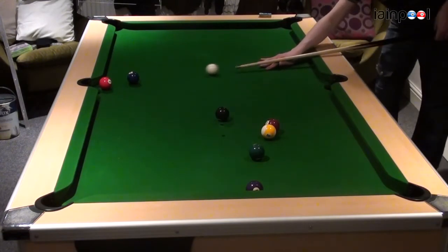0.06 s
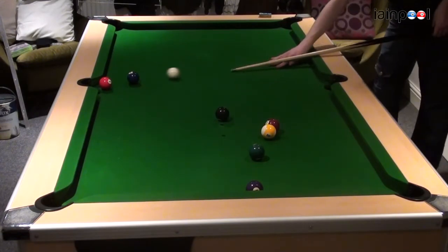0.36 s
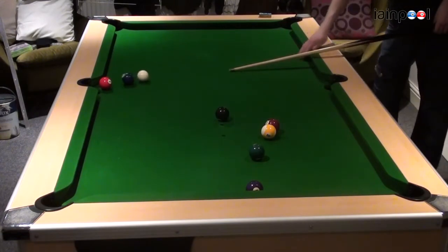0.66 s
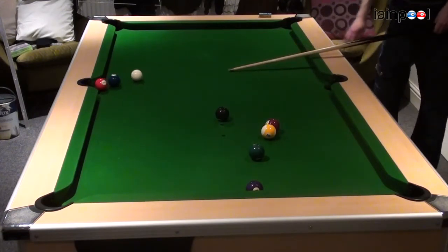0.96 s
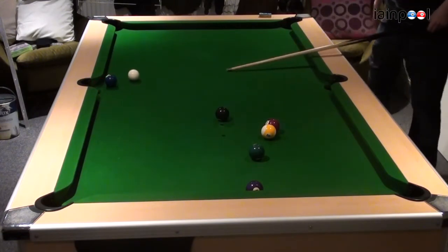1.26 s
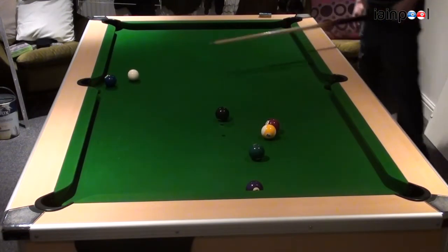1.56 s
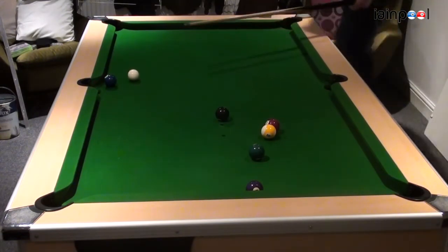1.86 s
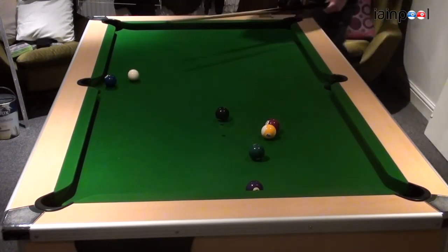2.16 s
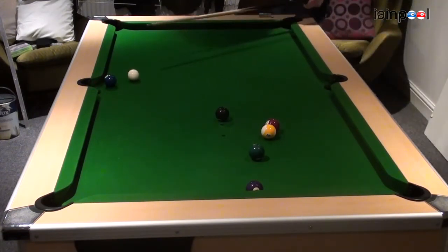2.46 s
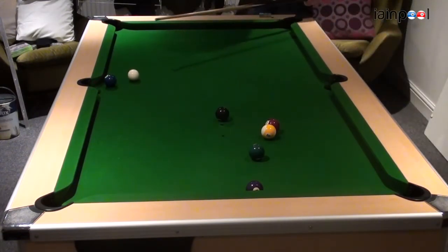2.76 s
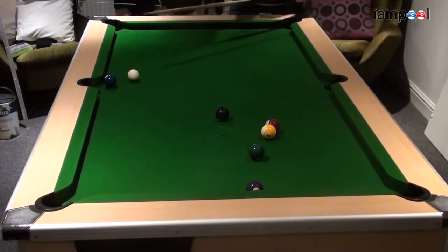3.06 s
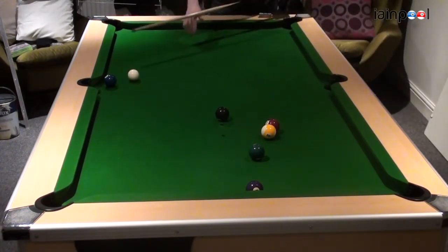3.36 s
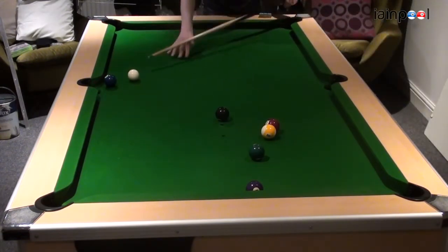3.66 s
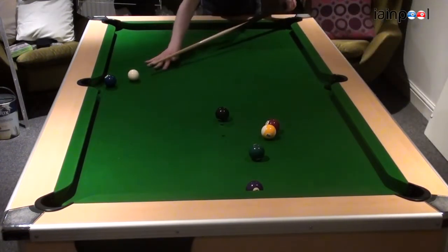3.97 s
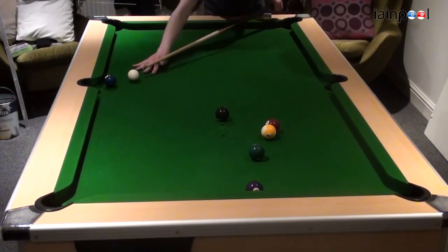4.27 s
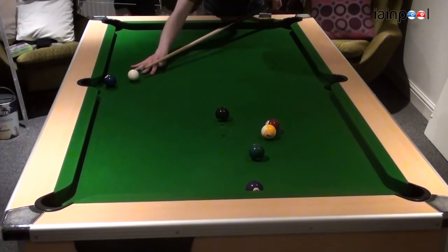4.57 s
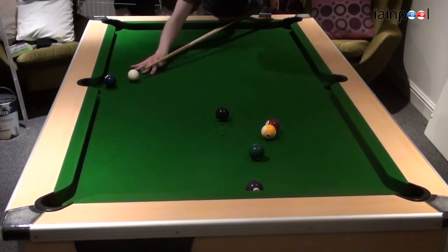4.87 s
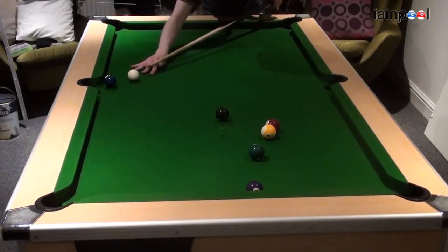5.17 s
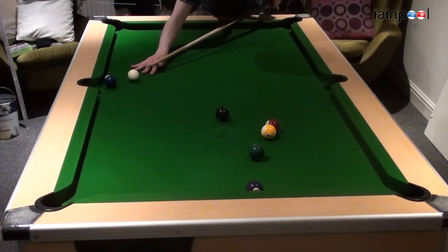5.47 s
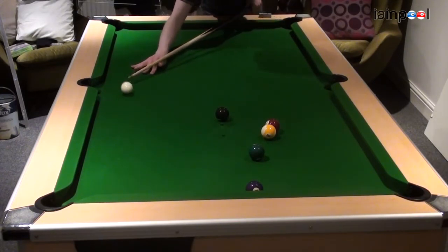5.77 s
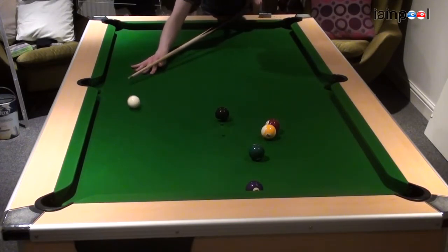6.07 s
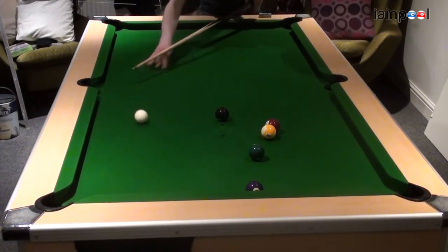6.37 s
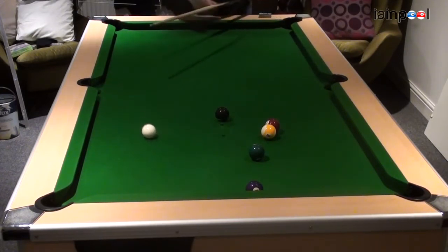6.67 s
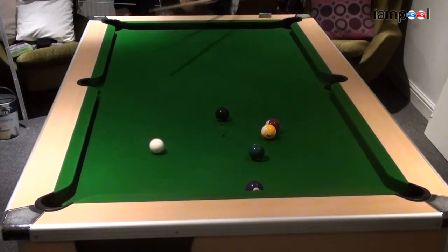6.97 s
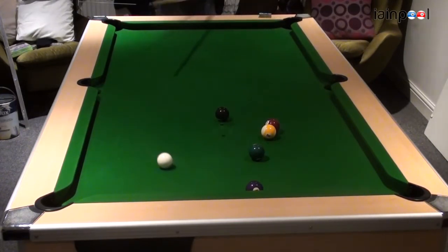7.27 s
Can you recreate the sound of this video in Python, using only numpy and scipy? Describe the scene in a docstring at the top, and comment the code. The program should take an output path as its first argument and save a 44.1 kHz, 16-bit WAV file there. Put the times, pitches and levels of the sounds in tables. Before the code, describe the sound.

Two pool balls are potted in turn, with sharp clicks, pocket thuds, loud wooden knocks and a low rolling rumble.

```python
"""Two pots on a pool table

In a small, quiet room with a faint tick, a sleeve rustles and the cloth hisses. Colliding balls
radiate short pulses, heard as clicks. Each potted ball drops through a pocket, slams into the wooden
return channel and rumbles along it; the first also knocks at the bends and reaches the tray.
Every impact on the wood excites damped modes, which ring on together with the room."""
import sys
import numpy as np
from scipy import signal
from scipy.io import wavfile

SR = 44100
rng = np.random.default_rng(int(sys.argv[2]) if len(sys.argv) > 2 else 0)


def master_out(mix):
    """Clip the mix to full scale and print it as 16-bit PCM to the path in sys.argv[1]."""
    frames = np.transpose(np.atleast_2d(mix))
    ceiling = np.clip(frames, -1, 1)
    pcm = np.round(ceiling * 32767).astype(np.int16)
    wavfile.write(sys.argv[1], SR, pcm)


N = 332073
AGE = np.arange(SR) / SR   # time since an impact [s]


def from_db(db):
    """Level to amplitude ratio."""
    return np.exp(np.asarray(db) * (np.log(10) / 20))


def rms_one(x, count=None):
    """Normalise to unit rms over the first count samples."""
    return x / np.sqrt(np.mean(x[..., :count] ** 2) + 1e-30)


def at_hz(points, hz):
    """Interpolation on a log-frequency axis."""
    frequencies, values = np.array(points).T
    return np.interp(np.log(hz), np.log(frequencies), values)


def cut(x, hz, kind, order=2):
    """Causal Butterworth filter."""
    return signal.sosfilt(signal.butter(order, np.minimum(hz, .48 * SR), kind, fs=SR, output="sos"), x)


def add(out, s, sound):
    """Superpose a sound at time s."""
    at = round(s * SR)
    out[:, at:at + sound.shape[-1]] += sound[..., :N - at]


def bands(size, side_db):
    """Third-octave bands of stereo noise: (centre [Hz], width [Hz], signal)."""
    edges = 28 * 2 ** (np.arange(29) / 3)
    white = rng.standard_normal((2, 2, size + SR // 10))
    for k, (low, high) in enumerate(zip(edges, edges[1:])):
        mid, side = cut(white[k % 2], [low, high], "band", order=3)[:, -size:]
        hz = np.sqrt(low * high)
        yield hz, high - low, mid + from_db(at_hz(side_db, hz)) * side * [[1], [-1]]


def noise(spectrum, side_db):
    """Stationary noise of unit rms: band power is spectral density times bandwidth."""
    return rms_one(sum(from_db(at_hz(spectrum, hz)) * np.sqrt(width) * rms_one(band)
                       for hz, width, band in bands(N, side_db)))


def swells(rows, rest_db):
    """Incoherent addition: the powers of brief swells sum above a resting level."""
    power = from_db(rest_db) ** 2
    for s, rise_s, db in rows:
        age = np.clip((np.arange(N) / SR - s) / rise_s, 0, 10)
        power = power + from_db(db) ** 2 * age ** 2 * np.exp(1 - age ** 2)
    return np.sqrt(power)


# room noise spectrum: (frequency [Hz], density [dB])
ROOM_SPECTRUM = [(30, -27), (70, -2), (125, -2), (180, -6), (280, -2.5), (450, -5), (750, -3.5), (1200, -7),
                 (3000, -10), (8000, -14), (15800, -15.5)]
# its stereo width: (frequency [Hz], side re mid [dB])
ROOM_WIDTH = [(60, -25), (150, -11), (380, 1.5), (950, 1), (2380, -4), (5980, -8.5), (15000, -30)]
def room_tone():
    """Ambient noise: steady, and only partly coherent between the channels."""
    return from_db(-56) * noise(ROOM_SPECTRUM, ROOM_WIDTH)


# swells of hiss: (start [s], rise [s], level [dB])
CLOTH_SWELLS = [(.15, .42, -62.5), (.8, .1, -58.5), (3.75, .3, -65), (6.3, 0.32, -60)]
# hiss spectrum: (frequency [Hz], density [dB])
CLOTH_SPECTRUM = [(100, -42), (3000, -12), (5000, -10), (7200, -3.5), (9500, -11), (15000, -35)]
def cloth_hiss():
    """Amplitude-modulated noise: a high hiss over the cloth swells and fades."""
    return swells(CLOTH_SWELLS, rest_db=-66) * noise(CLOTH_SPECTRUM, ROOM_WIDTH)


# brushing movements: (start [s], rise [s], level [dB])
SLEEVE_BRUSHES = [(2.15, .05, -47.5), (2.378, 0.027, -45), (3.2, .03, -50.5), (4.135, .02, -51.5),
                  (6.85, .06, -54), (7.1, .13, -55.5), (7.43, .035, -48.5)]
# rustle spectrum: (frequency [Hz], density [dB])
SLEEVE_SPECTRUM = [(100, -26), (700, -12), (1400, 2.5), (2200, 1.5), (3000, -5), (4200, -10), (7000, -10),
                   (11000, -29), (15000, -34.5)]
def sleeve_rustle():
    """Friction noise: the player's sleeve and cue brush about."""
    return swells(SLEEVE_BRUSHES, rest_db=-72) * noise(SLEEVE_SPECTRUM, ROOM_WIDTH)


def ring_shape(hz, t60, swell, hold):
    """Build-up and decay: lows rise more slowly; the ring holds while panels feed the room, then dies."""
    build = 1 - np.exp(-np.minimum(AGE * (np.sqrt(hz / 1000) / swell), 20))
    return build * from_db((np.sqrt(AGE ** 2 + hold ** 2) - hold) * (-60 / t60))


# joint decay of table and room: (frequency [Hz], base T60 [s])
RING_DECAY = [(60, 0.56), (130, 0.5), (300, 0.49), (600, 0.4), (1200, 0.32), (2500, 0.29), (5000, 0.27),
              (8000, 0.15), (14000, 0.1)]
def knocks(wood, hits, spectrum, modes, modes_db, swell, hold, damping, crack_db):
    """Impulse response: a contact crack, strong modes and a dense crowd of weak ones; swell, hold in s."""
    out = np.zeros((2, N))
    onset = 2200   # samples over which levels are set
    for s, db, bass_db, treble_db, length, spot_hz, spot_db in hits:
        def colour(hz):
            """A blow's weight, hardness and position decide which modes it excites."""
            spot = spot_db * np.exp(-(np.log2(hz / spot_hz) / 0.31) ** 2)
            return from_db(bass_db / (1 + (hz / 200) ** 2) + treble_db / (1 + (2200 / hz) ** 2) + spot)
        at = rng.integers(2 * SR)   # each blow rings with its own stretch of noise
        crowd = strong = 0
        for hz, width, band in wood:
            envelope = ring_shape(hz, length * at_hz(RING_DECAY, hz) / damping, swell, hold)
            gain = from_db(at_hz(spectrum, hz)) * colour(hz) * np.sqrt(width)
            crowd += gain * rms_one(band[:, at:at + SR] * envelope)
        for hz, mode_db, t60 in modes:
            tone = np.sin(2 * np.pi * (hz * AGE + rng.random()))
            strong += from_db(mode_db) * colour(hz) * tone * ring_shape(hz, length * t60, swell, hold)
        snap = rng.choice([-1, 1], SR) * from_db(-60 * np.minimum(AGE / 0.011, 10))
        crack = cut(cut(snap, [1300, 9500], "band", order=3), 2200, "low", order=1)
        ring = rms_one(crowd, onset) + from_db(modes_db) * rms_one(strong, onset)
        blow = ring + from_db(crack_db + treble_db * .5) * rms_one(crack, onset)
        add(out, s, from_db(db) * rms_one(blow, onset))
    return out


# dense ring of a tick: (frequency [Hz], density [dB])
CLOCK_SPECTRUM = [(600, -35), (1000, -8), (1300, -2), (1700, -14), (3000, -31)]
# its modes: (frequency [Hz], level [dB], base T60 [s])
CLOCK_MODES = [(1234, 4, 0.12), (1320, -6, 0.16)]
def clock_ticks(wood, first_s=.848, period_s=2.002, db=-57, length=.9, spot_hz=1280, spot_db=2):
    """Periodic excitation: a faint, soft tick recurs."""
    ticks = [(s, db, 0, 0, length, spot_hz, spot_db) for s in np.arange(first_s, N / SR, period_s)]
    return knocks(wood, ticks, CLOCK_SPECTRUM, CLOCK_MODES,
                  modes_db=-2, swell=0.0066, hold=.005, damping=1.3, crack_db=-50)


# legs of the return channel: (start [s], end [s], level [dB], slope [dB/s])
ROLL_LEGS = [(1.95, 3.06, -41.5, -12), (3.1, 4.16, -64.5, 13.5), (4.3, 5.19, -46.5, -1.5),
             (6.35, 7.53, -40, -10.5)]
# cabinet modes: (frequency [Hz], bandwidth [Hz], level [dB])
CABINET_MODES = [(70, 5.7, -3.5), (122.6, 8.3, 0.5), (186.5, 6.8, -1.5), (276.3, 4.7, -5.5),
                 (356.5, 4.7, -2), (401.7, 5.6, -4), (535, 5.5, -5), (915, 9, -16.5)]
# rumble spectrum: (frequency [Hz], density [dB])
RUMBLE_SPECTRUM = [(30, -31), (60, -7), (130, -1), (230, 0), (350, 1), (520, -5), (700, -4), (1000, -16.5),
                   (1500, -25), (3000, -51)]
# stereo width of rumble and knocks: (frequency [Hz], side re mid [dB])
CABINET_WIDTH = [(60, -30), (500, -19), (1500, -15.5), (4000, -11), (8000, -21), (13000, -38)]
def rolling(bumps_per_s=35, rise_s=.27, t60_s=.6):
    """Forced vibration: small bumps under a rolling ball drive the cabinet's modes."""
    bumps = (rng.random(N) < bumps_per_s / SR) * rng.choice([-1, 1], N)
    t = np.arange(N) / SR
    drone = gain = 0
    for hz, width_hz, db in CABINET_MODES:
        radius = np.exp(-np.pi * width_hz / SR)
        feedback = [1, -2 * radius * np.cos(2 * np.pi * hz / SR), radius ** 2]
        force = rms_one(bumps) + from_db(-10) * rng.standard_normal(N)
        drone += from_db(db) * rms_one(signal.lfilter([1, 0, -1], feedback, force))
    for start, end, db, db_per_s in ROLL_LEGS:   # the level follows the ball's change of speed
        rolled = np.clip(t - start, 0, end - start)
        decay_db = 60 * np.maximum(t - end, 0) / t60_s
        gain += np.minimum(rolled / rise_s, 1) * from_db(db + db_per_s * rolled - decay_db)
    rumble = noise(RUMBLE_SPECTRUM, CABINET_WIDTH) + from_db(1.5) * rms_one(drone)
    return gain * rms_one(cut(rumble, 1500, "low", order=4))


# cue blows: (time [s], level [dB], bass [dB], treble [dB], T60 factor, peak [Hz], lift [dB])
CUE_HITS = [(5.615, -31.5, 1, -7, 0.9, 630, -2)]
# dense ring: (frequency [Hz], density [dB])
CUE_SPECTRUM = [(60, -16), (200, -10), (330, -4), (650, -8), (900, -4), (1250, -8.5), (2200, -12),
                (3200, -20), (5000, -17.5), (6700, -10), (9000, -32), (14000, -50)]
# cue modes: (frequency [Hz], level [dB], base T60 [s])
CUE_MODES = [(284, -14, 0.23), (633, 6.5, 0.04), (1260, -7, 0.14), (1760, -5, 0.11)]
def cue_strike(wood):
    """Impact excitation: the cue rings on striking the ball."""
    return knocks(wood, CUE_HITS, CUE_SPECTRUM, CUE_MODES,
                  modes_db=0, swell=0.00029, hold=0.0012, damping=0.75, crack_db=-27)


# collisions: (time [s], level [dB], cutoff [Hz], direct [dB], echo [dB], echo delay [s], crack [dB])
COLLISIONS = [(0.6737, -28, 3160, -21, -15, 0.0031, -40), (0.926, -32.5, 2680, 3, 5, 0.003, -48),
              (5.6682, -20, 3350, 1, 2, 0.00313, -34.5)]
# room modes: (frequency [Hz], level [dB], T60 [s])
ROOM_MODES = [(1683, 2, 0.18), (1874, 0, 0.19), (2230, -4, 0.37), (2650, 4, 0.073), (3070, 4, 0.13)]
def ball_clicks(wall_s=0.0052, room_t60=0.22, room_swell_s=0.0016):
    """Acceleration noise: balls radiate one pulse without ringing; an overhead echo and the room follow."""
    out = np.zeros((2, N))
    late = np.maximum(AGE - wall_s, 0)   # time since the first wall reflection
    swell = 1 - np.exp(-late / room_swell_s)
    density = np.clip((AGE / 0.049) ** 2, .2, 1)   # reflections crowd together with time
    for s, db, top_hz, direct_db, echo_db, echo_s, crack_db in COLLISIONS:
        paths = np.zeros((2, SR))
        paths[:, 0], paths[:, round(echo_s * SR)] = from_db(direct_db), from_db(echo_db)
        mid, side = rng.choice([-1, 1], (2, SR)) * (rng.random((2, SR)) < density) / np.sqrt(density)
        reflections = (mid + from_db(-14) * side * [[1], [-1]]) * swell * from_db(-60 * late / room_t60)
        ring = sum(from_db(mode_db - 60 * late / t60) * np.sin(2 * np.pi * (hz * AGE + rng.random()))
                   for hz, mode_db, t60 in ROOM_MODES)
        direct = cut(rms_one(paths), 1600, "high")
        room = cut(from_db(2.5) * rms_one(reflections), 1600, "high")
        body = cut(direct + room, top_hz, "low", order=10)   # contact time limits the bandwidth
        click = body + from_db(crack_db) * direct + from_db(-35) * cut(room, 8400, "low")
        ringing_click = rms_one(click) + from_db(-12) * rms_one(ring * swell)
        add(out, s, from_db(db) * rms_one(ringing_click, count=2200))
    return out * from_db([[.8], [-.8]])


# lip blows: (time [s], level [dB], bass [dB], treble [dB], T60 factor, peak [Hz], lift [dB])
LIP_HITS = [(1.2223, -25.5, 0, -6.5, .95, 1460, 1.7), (1.3561, -32, 0, -12.5, 0.98, 1310, 5.2),
            (1.413, -43, 0, 10.5, 1.2, 1980, 1), (5.838, -37, 0, -16, 0.52, 1250, 5.9),
            (5.86, -29, 0, 2, 1.2, 1160, 1.8), (5.951, -41.5, 0, -2, 0.7, 1170, 2)]
# dense ring: (frequency [Hz], density [dB])
LIP_SPECTRUM = [(100, -38), (400, 7.5), (800, -1), (1300, 0.5), (2000, -4.5), (3000, -9.5), (4500, -21),
                (7500, -13.5), (10000, -52), (15000, -59)]
# lip modes: (frequency [Hz], level [dB], base T60 [s])
LIP_MODES = [(1132, 0, 0.13), (1573, -7.5, 0.053), (1980, 4, 0.067), (2800, -19, .14)]
def pocket_lip(wood):
    """Broadband excitation: a ball raps sharply on the pocket lip."""
    return knocks(wood, LIP_HITS, LIP_SPECTRUM, LIP_MODES,
                  modes_db=-14, swell=.0002, hold=0.0026, damping=1.21, crack_db=-29)


# thuds: (time [s], level [dB], bass [dB], treble [dB], T60 factor, peak [Hz], lift [dB])
DROP_HITS = [(0.744, -56.5, 10, -9, 1.3, 74, 31), (1.231, -22, 1.5, 10, 0.76, 174, 3),
             (1.365, -32, 1, -11, 0.77, 183, 6.5), (1.415, -38.5, 8, -10, 0.75, 276, 9),
             (5.75, -35.5, 10.5, -9, 0.65, 363, 3), (5.87, -18, -1.5, 0, 0.9, 282, 4.2),
             (5.956, -36, 16, -1, .9, 354, 3.8)]
# dense ring: (frequency [Hz], density [dB])
DROP_SPECTRUM = [(35, -30), (70, -6.5), (120, -3), (220, -5.5), (370, -2), (550, -9.5), (900, -10),
                 (1600, -41), (4000, -44), (15000, -68)]
# low modes: (frequency [Hz], level [dB], base T60 [s])
DROP_MODES = [(170.2, -10, 0.74), (271, -4.5, 0.38), (355, -2.5, 0.43), (384.5, 1, 0.28)]
def dull_drops(wood):
    """Low-frequency excitation: drops and cushion thuds move mainly the low modes."""
    return knocks(wood, DROP_HITS, DROP_SPECTRUM, DROP_MODES,
                  modes_db=2, swell=0.001, hold=0.0036, damping=1.01, crack_db=-39)


# blows at bends: (time [s], level [dB], bass [dB], treble [dB], T60 factor, peak [Hz], lift [dB])
BEND_HITS = [(3.061, -38, 5, -10, 1.05, 62, 18), (3.07, -32, -9, -21, 1.04, 590, 16),
             (3.073, -38, -6, -3.5, 0.95, 1010, 5.3), (4.24, -26, -3, 9.5, 1.15, 1500, 1.7),
             (4.263, -24, -1, -35, 0.97, 407, 11.7)]
# light bumps: (time [s], level [dB], treble [dB], peak [Hz], lift [dB])
BUMPS = [(2.055, -48, -16, 494, 4), (3.855, -49, -3, 330, 7), (3.945, -41.5, -28, 354, 24),
         (4.005, -44.5, -24, 310, 11), (4.11, -51, -1, 330, 3), (7.115, -44, -9, 700, 6)]
# dense ring: (frequency [Hz], density [dB])
BEND_SPECTRUM = [(35, -31), (62, -14.5), (120, -1.5), (250, 0.5), (600, -5), (1000, -3), (1700, -8.5),
                 (3000, -17.5), (4500, -26), (7500, -27), (10000, -44), (15000, -61)]
# bend modes: (frequency [Hz], level [dB], base T60 [s])
BEND_MODES = [(102.5, -5.5, 0.75), (167.7, -2, 0.4), (200, -0.5, 0.31), (318.6, -6, 0.29), (368, -15, 0.24),
              (398, -4.5, .3), (468, -16, 0.3), (563, 3, 0.32), (604, -6, 0.42), (1025, -0.5, 0.23)]
def channel_bends(wood, bump_bass_db=3, bump_length=.76):
    """Structure-borne sound: bends and uneven spots jolt the same wood."""
    bumps = [(s, db, bump_bass_db, treble, bump_length, hz, lift) for s, db, treble, hz, lift in BUMPS]
    return knocks(wood, [*BEND_HITS, *bumps], BEND_SPECTRUM, BEND_MODES,
                  modes_db=-5, swell=0.0013, hold=0.012, damping=1.42, crack_db=-20.5)


# tray blows: (time [s], level [dB], bass [dB], treble [dB], T60 factor, peak [Hz], lift [dB])
TRAY_HITS = [(5.1883, -15, -10.5, -5.5, 0.78, 370, 4.5), (5.2355, -26.5, -26, 12, 0.8, 1600, 9),
             (5.262, -31, 14, -12, 0.9, 131, 18.6)]
# dense ring: (frequency [Hz], density [dB])
TRAY_SPECTRUM = [(35, -49), (70, -12), (130, -19.5), (200, -10.5), (330, -7), (520, -4), (980, -7.5),
                 (1300, -21), (2000, -22), (3000, -29), (4500, -40.5), (7500, -49), (14000, -68)]
# tray modes: (frequency [Hz], level [dB], base T60 [s])
TRAY_MODES = [(123.5, -17, .5), (321.4, 0, 0.45), (343, 1.5, 0.31), (491, 0.5, 0.36), (544, 5.5, 0.19),
              (602, -3, 0.31), (703, 0, 0.25), (826, -2, 0.25), (998, -3.5, 0.24)]
def ball_tray(wood):
    """Damped free vibration: the tray rings as a ball arrives."""
    return knocks(wood, TRAY_HITS, TRAY_SPECTRUM, TRAY_MODES,
                  modes_db=-4, swell=0.0015, hold=0.012, damping=1.15, crack_db=-21)


# slams: (time [s], level [dB], bass [dB], treble [dB], T60 factor, peak [Hz], lift [dB])
CHANNEL_HITS = [(1.7734, -16, 1.6, 1, 0.96, 557, 1), (1.796, -17.5, 11.5, -21.5, 0.99, 126, 4.6),
                (6.3115, -14.5, 5.5, -0.5, 1, 390, 0.8), (6.356, -18.5, 11, -37, 1.0, 126, 7.9)]
# dense ring: (frequency [Hz], density [dB])
CHANNEL_SPECTRUM = [(30, -31), (60, -13.5), (120, -11.5), (190, -10), (360, -1), (600, -3), (1000, -5.5),
                    (2000, -5), (2900, -9.5), (4300, -19), (7400, -16.5), (10000, -29), (15000, -73)]
# channel modes: (frequency [Hz], level [dB], base T60 [s])
CHANNEL_MODES = [(95.2, -4, 0.31), (126.4, 3.5, 0.32), (186, -14, 1), (247.2, -11, 0.98), (323, -2.5, 0.54),
                 (353.6, -10.5, 0.57), (409.4, -2.5, 0.72), (539, 4.5, 0.44), (636, 1, 0.53),
                 (719, 1, 0.56), (1051, 1, 0.41), (1720, -28, 0.16), (1980, 5, 0.21)]
def channel_slams(wood):
    """Panel radiation: a ball slams into the channel's end wall and the wood resounds."""
    return knocks(wood, CHANNEL_HITS, CHANNEL_SPECTRUM, CHANNEL_MODES,
                  modes_db=-5, swell=0.0026, hold=0.023, damping=0.87, crack_db=-16.5)


def scene():
    """Superposition of the strokes on the table, the cabinet and the room."""
    wood = list(bands(3 * SR, CABINET_WIDTH))   # noise bands stand for densely overlapping modes
    cue = cue_strike(wood)
    impacts = pocket_lip(wood) + dull_drops(wood) + channel_slams(wood)
    impacts += channel_bends(wood) + ball_tray(wood)
    clock = clock_ticks(wood)
    cabinet = (impacts + rolling()) * from_db([[-.5], [.5]])   # a little to the right
    return cue + cabinet + clock + sleeve_rustle() + cloth_hiss() + ball_clicks() + room_tone()


def record(dry):
    """Band limiting: the microphone sheds the deepest bass and the top is cut."""
    return cut(cut(dry, 53, "high", order=3), 15900, "low", order=24)


dry = scene()
out = record(dry)
master_out(out)
```